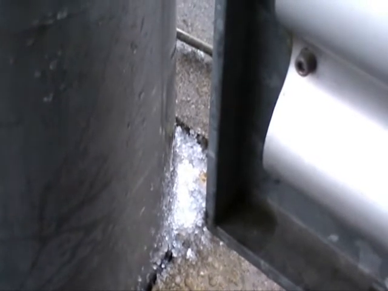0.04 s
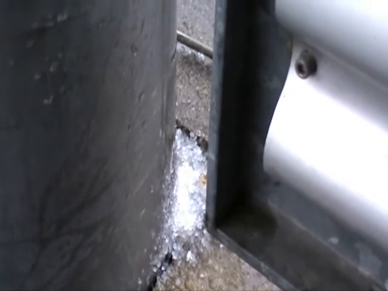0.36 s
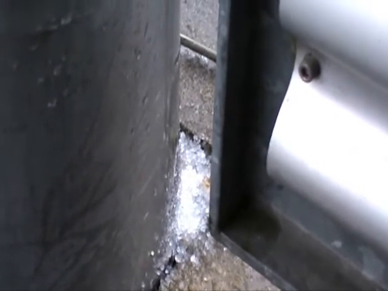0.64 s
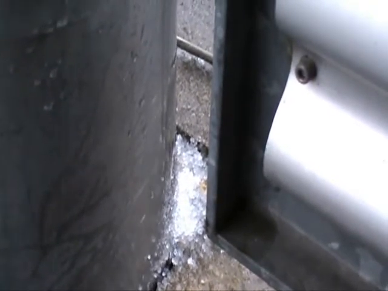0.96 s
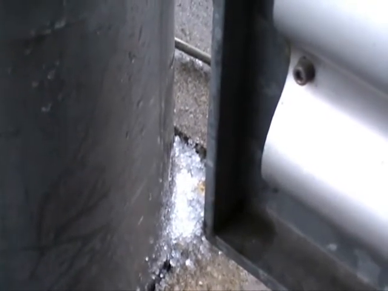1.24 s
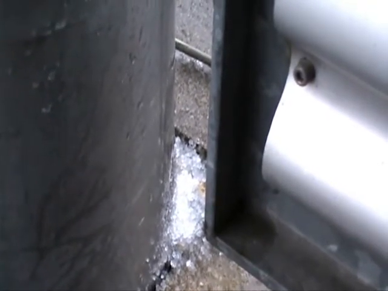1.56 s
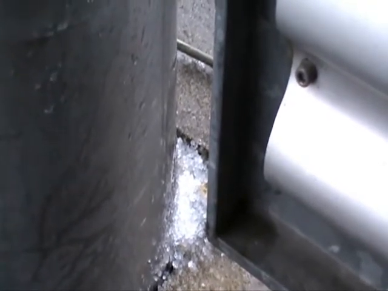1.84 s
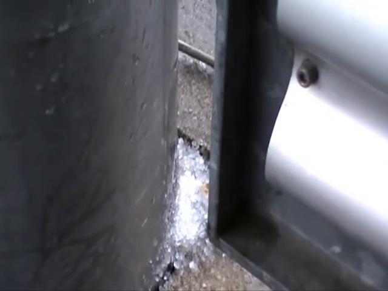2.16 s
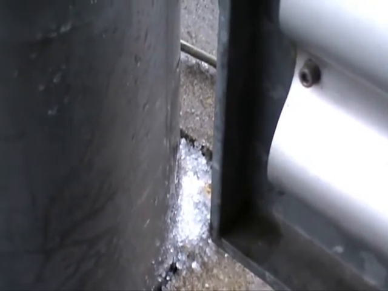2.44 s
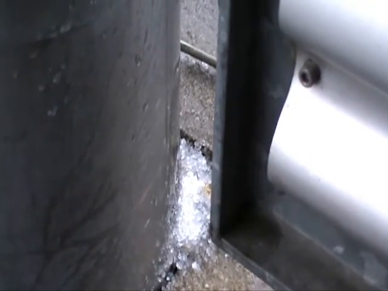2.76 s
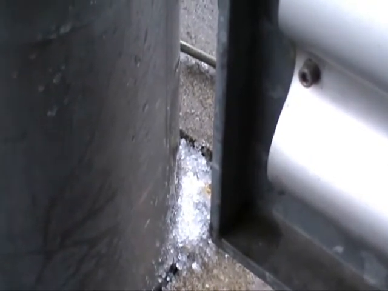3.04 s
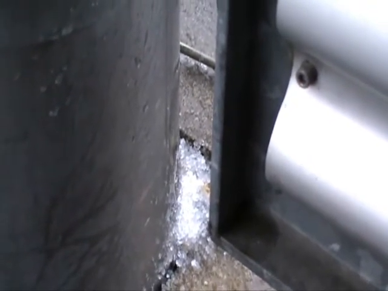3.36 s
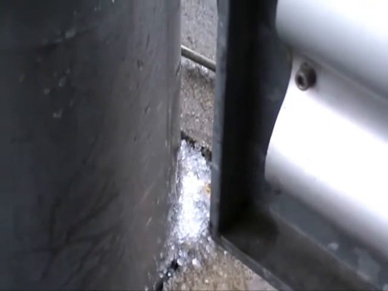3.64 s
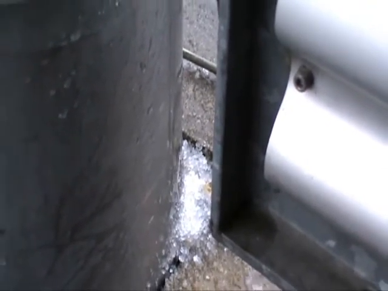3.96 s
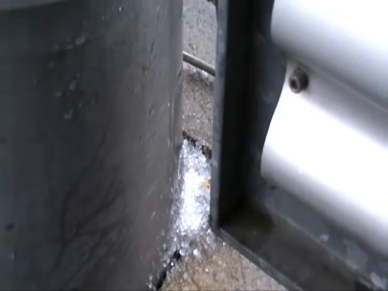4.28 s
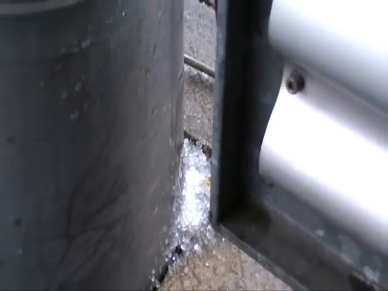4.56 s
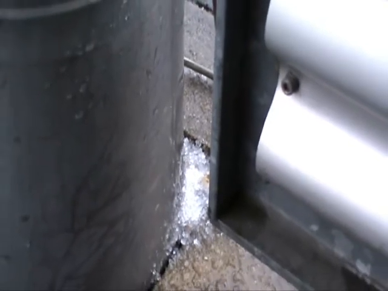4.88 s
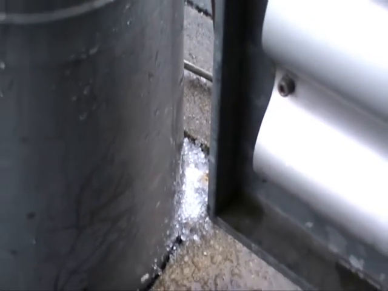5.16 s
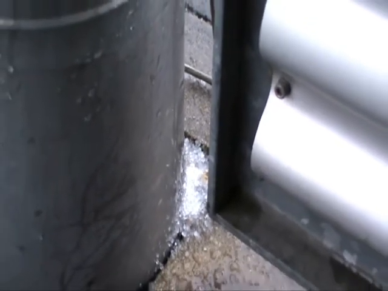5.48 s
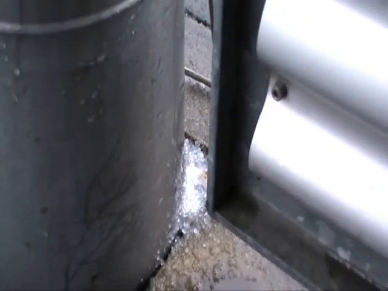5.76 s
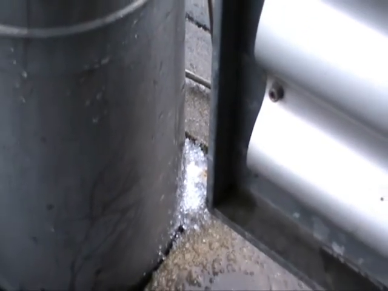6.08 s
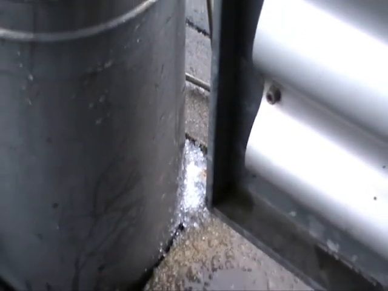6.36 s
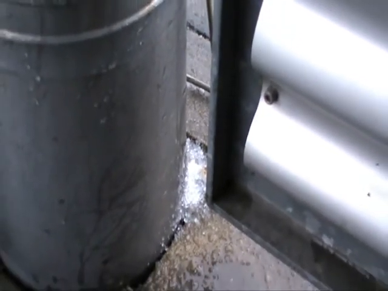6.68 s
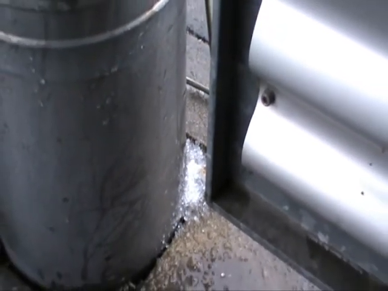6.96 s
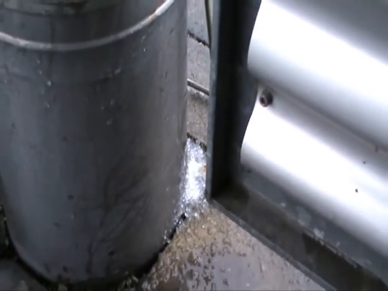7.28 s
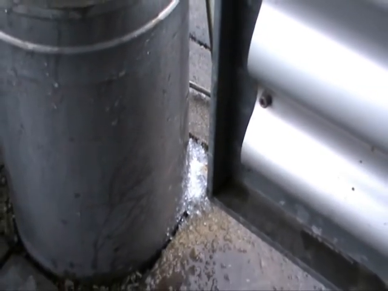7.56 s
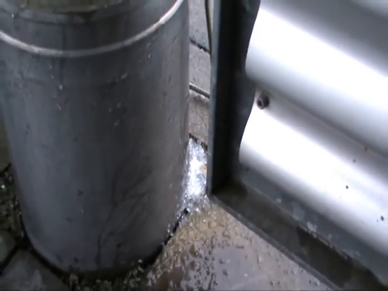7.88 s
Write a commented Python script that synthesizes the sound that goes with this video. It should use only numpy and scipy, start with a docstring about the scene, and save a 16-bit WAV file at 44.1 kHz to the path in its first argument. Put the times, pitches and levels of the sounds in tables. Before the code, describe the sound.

Hailstones crack and patter on wet concrete, ice and metal close by, coming in surges and then thinning out.

```python
"""Hailstones crack and patter on wet concrete and a heap of ice between a metal bin and a shutter.
Each stone cracks and throws a short spray of chips; the largest land close by and ring briefly.
The hail comes in surges, then thins out. Behind it lie the rattle of the yard, the wash of the far
shower, hollow low tones, a thin hum and a few puffs of wind on the microphone."""
import sys
import numpy as np
from scipy import signal
from scipy.fft import rfft, irfft
from scipy.io import wavfile
from scipy.ndimage import uniform_filter1d

SR = 44100
rng = np.random.default_rng(int(sys.argv[2]) if len(sys.argv) > 2 else 0)


def persist_wave(psi):
    """Save psi, clipped to +-1, as 16-bit WAV."""
    counts = np.round(np.clip(psi, -1, 1) * 32767).astype(np.int16)
    wavfile.write(sys.argv[1], SR, np.atleast_2d(counts).T)


N = 349272
TIME = np.arange(N) / SR
FREQ = np.maximum(np.fft.rfftfreq(N, 1 / SR), 1)
IMPACT_TIME = TIME[:4096]
STEADY_DB = -24  # the shower strength that counts as a steady fall


def gain(db):
    """Turn decibels into a multiplier."""
    return 10 ** (np.asarray(db) / 20)

def unit(x):
    """Scale to an average (rms) level of 1."""
    return x / np.sqrt(np.mean(x ** 2))

def curve(points):
    """Join a table's points into a curve over all pitches."""
    hz, value = np.transpose(points)
    return np.interp(np.log(FREQ), np.log(hz), value)

def colour(x, points):
    """Give a sound the tone colour in a table."""
    cepstrum = irfft(curve(points) * np.log(10) / 20, N)
    # nothing sounds ahead of a click, so it keeps its sharp front
    cepstrum[1:N // 2] *= 2
    cepstrum[N // 2 + 1:] = 0
    return irfft(rfft(x) * np.exp(rfft(cepstrum)), N)

def wander(per_s):
    """A random drift that turns per_s times a second."""
    knots = rng.standard_normal(int(N / SR * per_s) + 2)
    return np.interp(TIME * per_s, np.arange(len(knots)), knots)

def resonance(hz, pitch_hz, width_hz):
    """Let through a narrow band around one pitch."""
    return 1 / (1 + 2j * (hz - pitch_hz) / width_hz)

def ticks(spread_db, count):
    """Lone clicks at random times, most small and a few large."""
    when, mass, sign = rng.random((count, 3)).T
    size = gain(-spread_db * np.log(1 - .98 * mass))
    return np.bincount((when * N).astype(int), np.sign(sign - .5) * size, N)

# how far the left side runs ahead (negative is behind): pitch_hz, lead_radians
LEFT_LEAD = [(100, 0), (430, -.45), (950, -.65), (2600, -.1), (4500, 0)]
def stereo(mid, side, width):
    """Left and right share the mid and get the side with opposite signs; the right leads a little."""
    mid, side = rfft(mid), rfft(side) * gain(curve(width))
    turn = np.exp(.5j * curve(LEFT_LEAD))
    return irfft(np.array([mid * turn + side, mid / turn - side]), N)

# tone colour of the far shower: pitch_hz, level_db
FAR_COLOUR = [(25, -9), (60, -3), (110, -3), (230, -3), (310, -4.5), (560, -2.5), (800, -6.5),
              (1500, -12.5), (3000, -18.5), (7000, -13), (12000, -28.5)]
# hollow tones of the surroundings: pitch_hz, width_hz, level_db
HOLLOW_TONES = [(58, 8, -56), (74, 17, -54), (150.9, 15.5, -48.5), (215.2, 11, -48.5), (249, 31, -49.5)]
def far_shower():
    """Far hail blurs into a slowly sinking wash; noise held in narrow bands adds hollow tones."""
    wash = unit(colour(rng.standard_normal(N), FAR_COLOUR)) * gain(-37 + .63 * wander(per_s=5))
    fade_db = np.interp(TIME, [0, 3.2, 6.8, 7.9], [2, 1.5, .5, -4])
    tones = 0
    for pitch_hz, width_hz, level_db in HOLLOW_TONES:
        band = rfft(rng.standard_normal(N)) * resonance(FREQ, pitch_hz, width_hz) ** 2
        tones += gain(level_db) * unit(irfft(band, N))
    return wash * gain(fade_db) + tones

# the hum coming and going: time_s, level_db
HUM_LEVELS = [(0, -54), (.9, -45.5), (1.7, -52), (2.2, -69), (2.72, -46.5), (3.5, -44.5), (4, -53),
              (5.2, -64)]
def hum(pitch_hz=500.9):
    """A thin tone that wavers a little in pitch and level."""
    phase = 2 * np.pi * np.cumsum(pitch_hz + 4 * wander(per_s=20)) / SR
    level_db = np.interp(TIME, *np.transpose(HUM_LEVELS)) + 2 * wander(per_s=10)
    return np.sqrt(2) * np.sin(phase) * gain(level_db)

# puffs of wind: start_s, relative_peak_db, length_s
WIND_PUFFS = [(0.44, -27, 0.078), (0.927, -24.5, 0.032), (1.088, -17, 0.057), (3.275, -27, 0.035),
              (3.875, -22.5, 0.059)]
# tone colour of the wind: pitch_hz, level_db
WIND_COLOUR = [(20, -7.5), (45, -11), (75, -3), (130, -7.5), (200, -9), (350, -16), (700, -34), (2000, -61)]
def wind():
    """Short puffs thud on the microphone, a little differently left and right."""
    swell = 0
    for start_s, peak_db, length_s in WIND_PUFFS:
        swell += gain(peak_db) * np.exp(-(2 * (TIME - start_s) / length_s - 1) ** 2)
    mid, side = (unit(colour(rng.standard_normal(N), WIND_COLOUR)) for _ in range(2))
    return gain(-5) * swell * (mid + gain(-9) * np.array([side, -side]))

# three surges of hail with lulls between: time_s, strength_db
SURGES = [(0, -25.5), (.27, -28), (.48, -18), (.95, -24.5), (1.17, -21.5), (1.84, -30), (2.11, -29),
          (2.17, -39), (2.44, -38), (2.62, -30.5), (2.81, -35.5), (3.1, -29), (3.35, -31), (4.12, -30.5),
          (4.36, -21.5), (4.92, -23), (5.76, -34.5), (6.0, -28), (6.17, -32.5), (6.77, -22.5), (7.05, -36),
          (7.92, -42)]
def shower_strength(flurry_db=.7):
    """How hard it hails, in dB: slow surges with quick random flurries."""
    return np.interp(TIME, *np.transpose(SURGES)) + flurry_db * wander(per_s=14)

# tone colour of the yard: pitch_hz, level_db
YARD_COLOUR = [(200, -16.5), (480, -6), (780, -6.5), (1100, -1), (1700, 0), (2400, -4.5), (3600, -6.5),
               (6000, -27), (12000, -42)]
def yard_rattle(shower_db, follow=.72, fade_db_per_s=.58):
    """Stones all over the yard merge into a dull rattle that recedes as the shower moves off."""
    level_db = -30.32 + follow * (shower_db - STEADY_DB) - fade_db_per_s * TIME
    rattle = unit(colour(ticks(spread_db=1, count=30000), YARD_COLOUR))
    return rattle * gain(level_db + .5 * wander(per_s=25))

# pitches that ring between bin and shutter: pitch_hz, width_hz, lift_db
GAP_RINGS = [(1120, 54, 2), (3003, 62, 3.5), (3470, 23, 2.5), (3850, 26, 5), (4180, 64, 3),
             (4540, 110, 2.5), (5900, 65, 1), (6200, 34, 1.5), (6830, 90, 1), (7020, 82, 3.5),
             (7450, 60, 3), (7800, 70, 4), (8000, 58, 1)]
def narrow_gap(x):
    """Sound bouncing between bin and shutter lifts a row of narrow bands."""
    response = 1
    for pitch_hz, width_hz, lift_db in GAP_RINGS:
        response *= 1 + (gain(lift_db) - 1) * resonance(FREQ, pitch_hz, width_hz)
    return gain(-.08) * irfft(rfft(x) * response, N)

def wall_echoes(x, decay_s=.015):
    """The walls smear the sound briefly without changing its colour."""
    echoes = rfft(rng.standard_normal(len(IMPACT_TIME)) * np.exp(-IMPACT_TIME / decay_s), N)
    return irfft(rfft(x) * echoes / np.abs(echoes), N)

def impact(crack_db, crack_s, spray_s, echo_db, echo_s, rise_s):
    """Power of one hit over time: a crack, a fine spray of chips, a faint echo off the walls."""
    crack = gain(crack_db) ** 2 * np.exp(-IMPACT_TIME / crack_s)
    spray = np.exp(-(IMPACT_TIME / spray_s) ** 2)
    echo = gain(echo_db) ** 2 * np.exp(-IMPACT_TIME / echo_s)
    # chips and echoes take a moment to arrive
    return crack + (spray + echo) * (1 - np.exp(-IMPACT_TIME / rise_s))

# tone colour of cracking ice: pitch_hz, level_db
ICE_COLOUR = [(300, -26.5), (1000, -10), (2300, -8), (3300, -3.5), (4200, -2), (5500, 0), (7400, -1.5),
              (9000, -4.5), (11000, -12), (13000, -20), (15000, -73)]
def icy(x):
    """Give hits the bright sound of ice."""
    return colour(x, ICE_COLOUR)

def patter(shower_db, steady_stones_per_s=220, tint_db=8, count=4000):
    """Small stones land at random, more of them as the shower swells; their sprays overlap."""
    when, luck, mass, pitch = rng.random((count, 4)).T
    landing = (when * N).astype(int)
    stones_per_s = steady_stones_per_s * gain(.8 * (shower_db[landing] - STEADY_DB))
    falls = luck < stones_per_s * N / SR / count
    size = falls * gain(-2 * np.log(1 - .92 * mass))
    hit = impact(crack_db=7, crack_s=.0008, spray_s=.01, echo_db=-2, echo_s=.021, rise_s=.0041)
    octaves = np.log2(np.geomspace(2400, 12000, 10))
    noise = rfft(rng.standard_normal(N))
    sprays, total_power = 0, 0
    for octave in octaves:
        # every stone is brightest around its own pitch
        tint = gain(tint_db * np.exp(-((octave - np.log2(2400 * 5 ** pitch)) / .17) ** 2))
        power = np.abs(signal.oaconvolve(np.bincount(landing, (size * tint) ** 2, N), hit)[:N])
        band = irfft(noise * np.interp(np.log2(FREQ), octaves, octaves == octave), N)
        sprays += band * np.sqrt(power)
        total_power += power
    # even out chance swells, so the shower's strength sets the level
    slow_power = uniform_filter1d(uniform_filter1d(total_power, SR // 16), SR // 16)
    sprays = unit(sprays / np.sqrt(np.abs(slow_power) + .011 * np.mean(total_power)))
    bounces = gain(-12) * unit(ticks(spread_db=5, count=3000))
    return unit(icy(sprays + bounces)) * gain(shower_db + .5)

# large stones close by: start_s, relative_level_db, pitch_hz, hardness (0 to 1), treble_tilt_db
LARGE_STONES = [(.111, -20, 8740, .3, -4), (.144, -10.5, 4670, 0.4, 2), (.194, -6, 3500, .3, -4),
                (0.553, -10, 5450, .1, 3), (0.96, -11, 4700, 0.93, -1), (1.38, -7.5, 4540, .2, 4),
                (1.399, -4, 3880, .2, 2), (1.655, -8.5, 3940, 0.6, 4), (1.714, -9, 4600, 0.8, -2),
                (1.96, -11, 8460, 0.5, 2), (2.063, -13.5, 4100, .7, -5), (2.114, -14, 6220, 0.96, 0),
                (2.368, -14.5, 6200, 0, 1), (2.588, -16, 7800, 0, -1), (2.874, -10, 3940, 0, -1),
                (2.92, -9, 2960, 0.7, -7), (2.995, -9.5, 6740, 0.7, 5.5), (3.106, -12.5, 7450, 0, 2),
                (3.168, -8.5, 3840, 0.5, 4), (3.239, -13, 8550, 0.6, 2), (3.307, -19.5, 8890, 0.6, 1),
                (3.393, -10, 4760, 0.54, 3.5), (3.438, -8.5, 7100, 0.2, -1), (3.565, -8, 5580, 0, -4),
                (3.717, -12, 4290, 0.5, 5), (3.772, -4, 6900, 0.2, -10), (3.778, -18, 3730, .4, -12),
                (3.858, -12, 8100, 0.74, 1), (4.038, -8.5, 5100, 0, -6), (4.146, -19, 7500, 1, 2),
                (4.333, -6.5, 7080, 0, -18), (4.833, -12, 5200, .2, 7), (4.896, -6.5, 6220, 0.1, -1),
                (5.187, -9, 6120, .1, -1), (5.566, -13.5, 4270, 0.97, 6), (5.812, -11, 4150, 0.9, 3),
                (6.017, -9.5, 3530, 0.2, -2), (6.215, -14.5, 2910, 0.1, 5), (6.285, -16, 6200, 0.7, -4),
                (6.393, -8, 6200, 0, 0), (6.527, -8, 7470, 0.3, 2), (7.173, -14, 5530, 0.5, -3),
                (7.216, -13.5, 6600, 0.83, 1), (7.3, -21.5, 7390, 0.6, -9), (7.579, -24.5, 8140, .2, -7),
                (7.865, -23.5, 8000, 0.8, 2)]
def large_stones(ring_width_hz=380, overtone=1.9):
    """Single stones burst close by; the spot they strike rings briefly at two pitches."""
    length = len(IMPACT_TIME)
    out, hz = np.zeros(N + length), np.fft.rfftfreq(length, 1 / SR)
    for start_s, level_db, pitch_hz, hardness, treble_tilt_db in LARGE_STONES:
        # from a soft stone that shatters to a hard one that bounces
        ring_db = np.interp(hardness, [0, 1], [-7, 8.5])
        crack_db = np.interp(hardness, [0, 1], [-2, 8])
        spray_s = np.interp(hardness, [0, 1], [.022, .015])
        power = impact(crack_db, crack_s=.0015, spray_s=spray_s, echo_db=-11, echo_s=.019, rise_s=.00039)
        noise, mass = rng.standard_normal((2, length))
        chips = noise * gain(2.6 * mass) * np.sqrt(power)
        low = resonance(hz, pitch_hz, ring_width_hz)
        high = resonance(hz, overtone * pitch_hz, ring_width_hz)
        ring = 1 + gain(ring_db) * (low + gain(-9) * high)
        # a short contact reaches further into the treble
        contact = gain(treble_tilt_db * np.clip((hz - 7000) / 4000, 0, 1.5))
        first = int(start_s * SR)
        out[first:first + length] += gain(level_db) * irfft(rfft(chips) * ring * contact)
    return gain(-8.5) * icy(out[:N])

# how wide the close hail sounds: pitch_hz, side_gain_db
CLOSE_SPREAD = [(1000, -7), (2400, -9), (3600, -13), (4500, -26), (7500, -27), (12000, -21)]
# how wide the yard and far shower sound: pitch_hz, side_gain_db
FAR_SPREAD = [(60, -15), (200, -10), (400, -8), (1300, -5.5), (2400, -6), (3600, -9), (4600, -24),
              (12000, -24)]
def scene():
    """Close hail in the middle, the yard a little to the right, the far shower all around."""
    shower_db = shower_strength()
    hail = narrow_gap(large_stones() + patter(shower_db))
    near = stereo(hail, wall_echoes(hail), CLOSE_SPREAD)
    yard = stereo(narrow_gap(yard_rattle(shower_db)), yard_rattle(shower_db), FAR_SPREAD)
    far = stereo(far_shower(), far_shower(), FAR_SPREAD)
    return near + yard * gain([[-.83], [.83]]) + far + hum() + wind()

def record(dry):
    """Round off the tallest peaks and cut the highest treble."""
    ceiling, top_hz = .9, 13600
    rounded = ceiling * np.tanh(dry / ceiling)
    return signal.sosfilt(signal.ellip(8, .2, 70, top_hz, fs=SR, output="sos"), rounded)


dry = scene()
out = record(dry)
persist_wave(out)
```